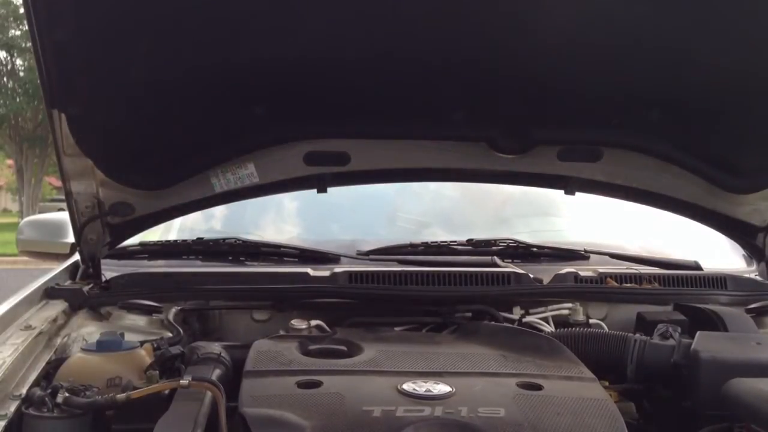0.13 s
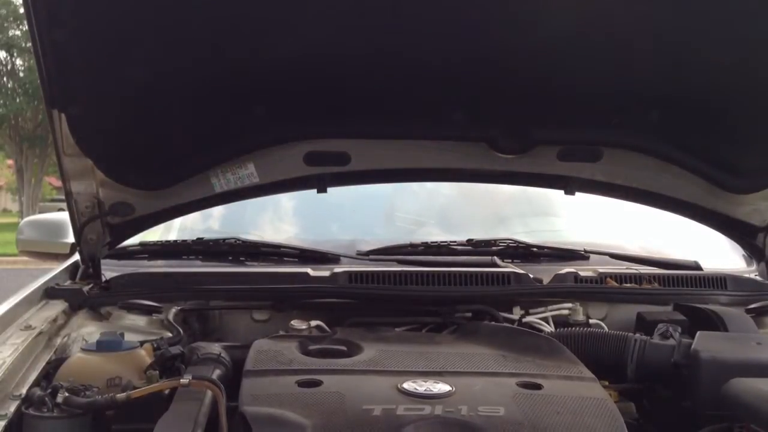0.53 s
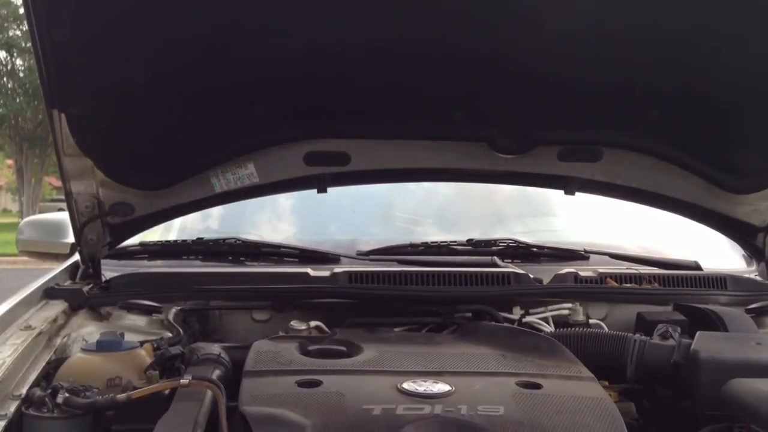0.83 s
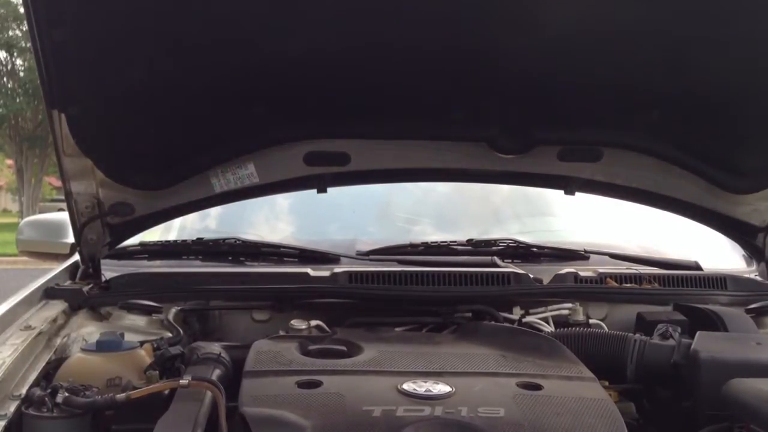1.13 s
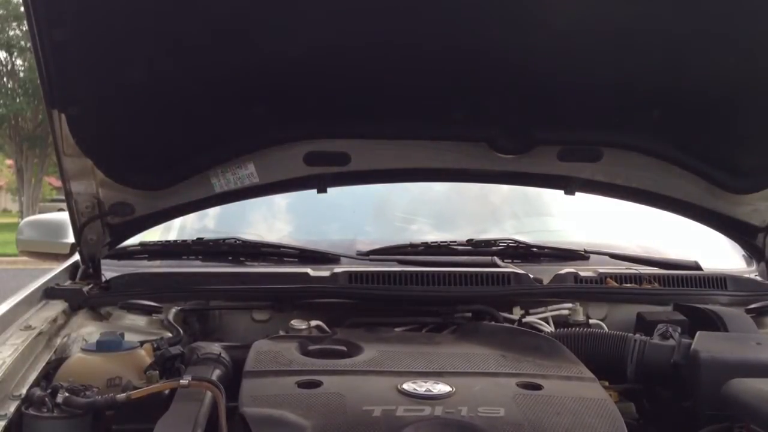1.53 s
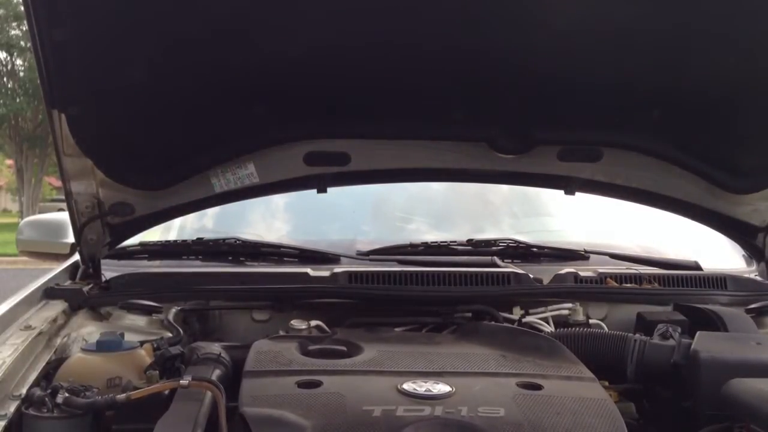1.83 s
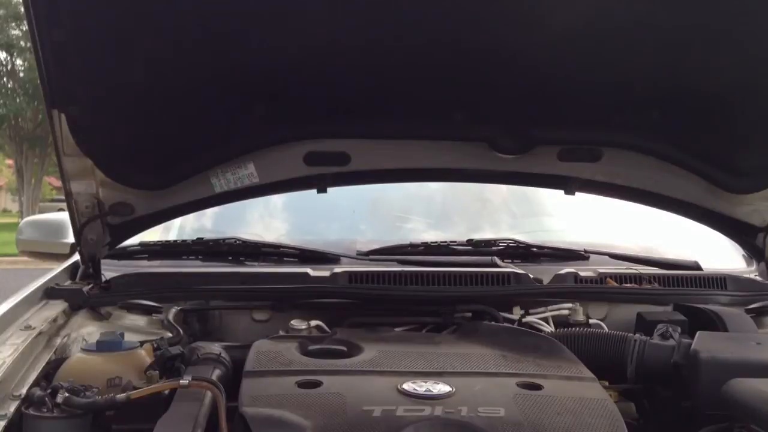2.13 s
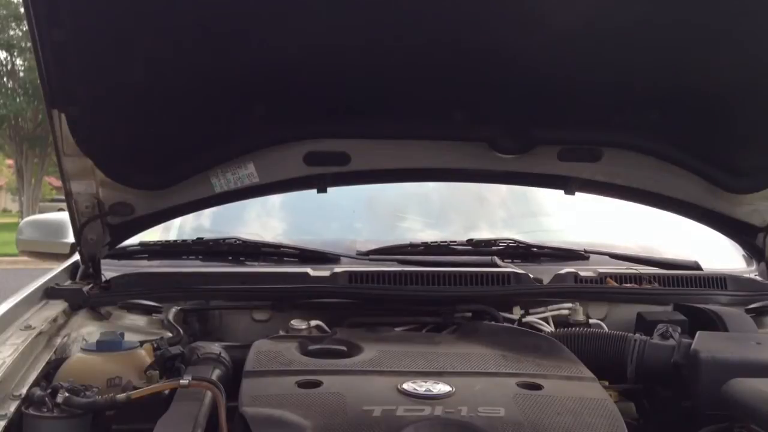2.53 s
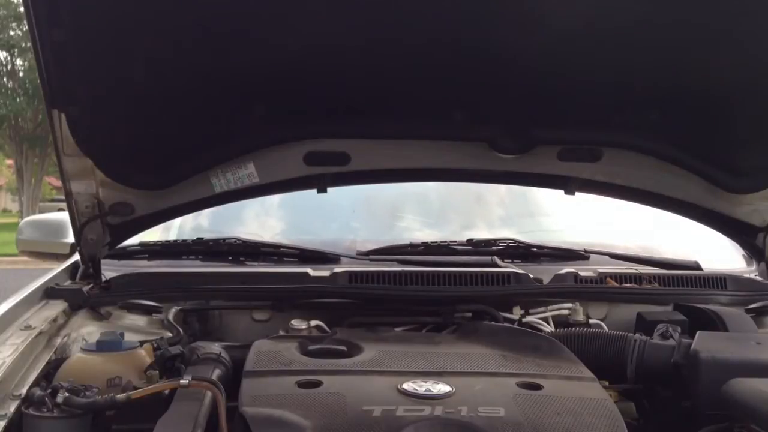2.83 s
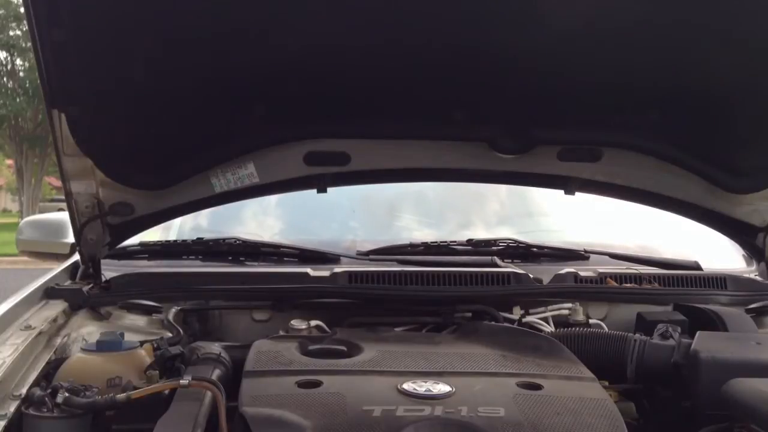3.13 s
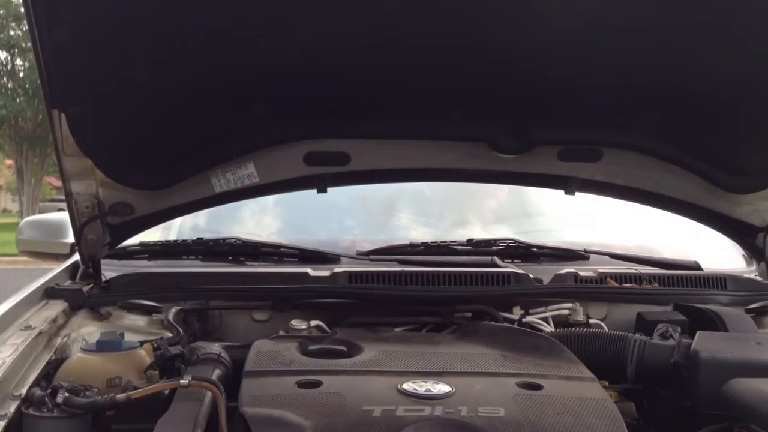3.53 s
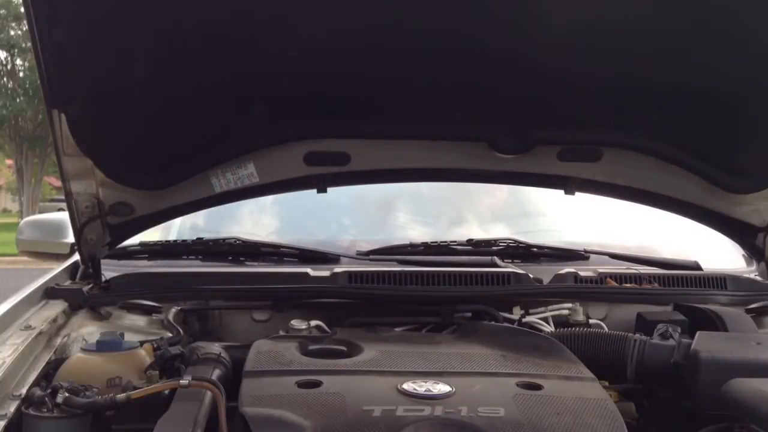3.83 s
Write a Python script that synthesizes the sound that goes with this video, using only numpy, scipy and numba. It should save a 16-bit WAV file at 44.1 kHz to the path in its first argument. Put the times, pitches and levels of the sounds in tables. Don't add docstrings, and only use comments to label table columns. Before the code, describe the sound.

A diesel engine runs down in an open engine bay, its hard metallic knocks spacing out from 0 to 0.6 s with low thumps and a faint squeal. At once a rough geared motor whirs, steady until about 1.4 s, then sinking and stopping near 2.05 s with a small catch. Quiet distant traffic and hum remain; faint birds whistle from 2.5 s, and a relay snaps and bounces at 2.8 s.

```python
import sys
import numpy as np
from scipy import signal
from scipy.fft import rfft, irfft
from scipy.io import wavfile
from scipy.ndimage import uniform_filter1d
from numba import njit

SR = 44100
rng = np.random.default_rng(int(sys.argv[2]) if len(sys.argv) > 2 else 0)


def how_loud(loudness_db):
    steps = np.asarray(loudness_db, float) / 20
    return 10 ** steps


def log_audio(samples):
    frames = np.atleast_2d(samples).T
    limited = np.clip(frames, -1, 1)
    pcm = np.round(limited * 32767).astype(np.int16)
    wavfile.write(sys.argv[1], SR, pcm)


N = 176400
TIME_S = np.arange(N) / SR


def level(x):
    return x / np.sqrt(np.mean(x ** 2))


def curve(rows, order, off=-120.):
    rows = np.array(rows)
    return np.interp(TIME_S, rows[:, 0], rows[:, order], off, off)


@njit
def svf(x, hz, width):
    y, band, low = np.empty(len(x)), 0., 0.
    g, k = np.tan(np.pi * hz / SR), width / hz
    for i in range(len(x)):
        v = (band + g * (x[i] - low)) / (1 + g * (g + k))
        band, low, y[i] = 2 * v - band, low + 2 * g * v, k * v
    return y


def resonate(x, hz, width_hz, times=1):
    for _ in range(times):
        x = svf(x, float(hz), float(width_hz))
    return x


def treble(x):
    return signal.sosfilt(signal.butter(2, 3600, "high", fs=SR, output="sos"), x)


def colour(x, table):
    table, size = np.array(table), 2048
    hz = np.maximum(np.arange(size // 2 + 1) * SR / size, 1)
    gain_db = np.interp(np.log(hz), np.log(table[:, 0]), table[:, 1])
    cep = irfft(gain_db * np.log(10) / 20)
    cep[1:size // 2] *= 2
    cep[size // 2 + 1:] = 0
    return signal.fftconvolve(x, irfft(np.exp(rfft(cep))))[:N]


def noise():
    return rng.standard_normal(N)


def walk(rate_hz):
    k = int(SR / rate_hz)
    held = np.repeat(rng.standard_normal(N // k + 1), k)
    return 1.3 * uniform_filter1d(uniform_filter1d(held, k), k)[:N]


def grit():
    return level(noise() * how_loud(1.5 * rng.exponential(size=N)))


def metal(gate, peaks, tilt, broad_db, flicker_db):
    x, ringing = gate * grit(), 0
    for k, (hz, width_hz, db) in enumerate(peaks):
        gain = (-1) ** k * how_loud(db + flicker_db * walk(25))
        ringing = ringing + gain * resonate(x, hz, width_hz)
    broad = level(colour(gate * grit(), tilt))
    return level(level(ringing) + how_loud(broad_db) * broad)


def tone(hz, db, wander, flutter_db):
    gain = np.sqrt(2) * how_loud(db + flutter_db * walk(30))
    return gain * np.sin(np.cumsum(2 * np.pi * hz * (1 + wander * walk(40)) / SR))


def gliding_tone(rows, wander, flutter_db):
    return tone(curve(rows, order=1, off=None), curve(rows, order=2), wander, flutter_db)


def rings(start_s, modes):
    u = np.arange(int(.2 * SR)) / SR
    out, at = np.zeros(N), int(start_s * SR)
    struck = sum(how_loud(db - 60 * u / t60) * np.sin(2 * np.pi * hz * u) for hz, db, t60 in modes)
    out[at:at + len(u)] = struck * np.minimum(u / .0016, 1)
    return out


# (frequency [Hz], density [dB per Hz])
TRAFFIC_TILT = [(15, -58), (25, -31), (104, -12), (147, -5.5), (226, -4.5), (329, -10), (2090, -25.5),
                (4320, -29), (15300, -35)]
# (pitch [Hz], width [Hz], level [dB])
MACHINE_HUM = [(157.6, 16, -59), (229, 8, -61), (343, 19, -75)]


def town():
    traffic = how_loud(-58 + 0.65 * walk(1.3)) * level(colour(noise(), TRAFFIC_TILT))
    hum = 0
    for hz, width_hz, db in MACHINE_HUM:
        hum = hum + how_loud(db + 1.5 * walk(5)) * level(resonate(noise(), hz, width_hz, times=2))
    return traffic + hum


# (time [s], length [s], slow-end pitch [Hz], fast-end pitch [Hz], level [dB])
RISING_CALLS = [(2.475, .075, 3330, 2600, -73), (2.62, .115, 3440, 2600, -69)]
FALLING_CALLS = [(2.865, .045, 4350, 3600, -73), (3.035, .06, 4420, 3500, -71),
                 (3.29, .045, 4400, 3300, -73), (3.475, .05, 4420, 3600, -71),
                 (3.655, .06, 4430, 3900, -70), (3.845, .05, 4400, 3500, -72), (3.0, .09, 900, 820, -68)]


def birds():
    out = 0
    for rows, rising in ((RISING_CALLS, True), (FALLING_CALLS, False)):
        for start_s, length_s, slow_hz, fast_hz, db in rows:
            u = np.clip((TIME_S - start_s) / length_s, 0, 1)
            sweep = (1 - u if rising else u) ** 3.5
            breath = np.sqrt(np.abs(np.sin(np.pi * u))) * (1 - .6 * sweep) * (u < 1)
            hoarse = .8 + .6 * walk(600)
            pitch_hz = slow_hz + (fast_hz - slow_hz) * sweep
            out = out + breath * hoarse * tone(pitch_hz, db, wander=.008, flutter_db=1.0)
    trees = rng.standard_normal(8000) * np.exp(-np.arange(8000) / SR / .04)
    return out + how_loud(-30) * signal.fftconvolve(out, trees)[:N]


# (time [s], level [dB], crack centre [Hz], ring level [dB], crack decay [s])
CLICKS = [
    (2.026, -44, 4500, -12, .01),
    (2.7545, -51, 4300, -9, 0.01),
    (2.773, -58, 450, 0, .008),
    (2.7925, -40, 3400, -4, 0.006),
    (2.808, -55, 1700, 2, .007),
    (2.822, -55, 7000, -8, .014),
    (2.824, -57, 10000, -10, .014),
]
# (pitch [Hz], level [dB], t60 [s])
RELAY_MODES = [(325, 1, .1), (565, 3, .045), (1723, -6, .05), (2848, -3, .06), (3144, -8, .07),
               (4430, -9, .05), (4640, -3, .07)]


def relay():
    out = 0
    for start_s, db, hz, ring_db, fall_s in CLICKS:
        since_s = np.maximum(TIME_S - start_s, 0)
        crack = noise() * np.exp(-since_s / fall_s) * (since_s > 0)
        thud = noise() * np.exp(-since_s / (2 * fall_s)) * (since_s > 0)
        modes = [(f, g - abs(np.log2(f / hz)), t60) for f, g, t60 in RELAY_MODES]
        body = how_loud(ring_db - 6) * rings(start_s, modes)
        snap = 1.6 * resonate(crack, hz, 0.7 * hz, times=2)
        fizz = how_loud(-13) * resonate(crack, 9500, 4000, times=2)
        housing = resonate(thud, 560, 400) + how_loud(-6.5) * resonate(thud, 1770, 1600)
        out = out + how_loud(db) * (body + snap + fizz + housing)
    return out


# (pitch [Hz], width [Hz], level [dB])
MOTOR_BODY = [(584.6, 25, -9), (996, 74, -4), (1199, 57, -1.5), (1256, 26, 2.5), (1457, 62, -4.5),
              (1670, 55, -6.5), (1937, 25, 1.5), (2007, 180, -9), (2311, 37.5, 1.5), (2660, 110, -6.5),
              (2860, 34, -4), (3073, 120, -9.5), (5000, 660, -14), (9320, 250, -19)]
# (frequency [Hz], density [dB per Hz])
MOTOR_TILT = [(35, -83.5), (60, -40), (290, -6), (472, -17), (581, -8.5), (2280, -1.5), (3460, -10),
              (9170, -15), (15300, -22)]


def motor_casing(teeth, hz):
    casing = metal(teeth, MOTOR_BODY, MOTOR_TILT, broad_db=-3, flicker_db=1.2)
    treble_db = -1 * np.log2(hz / 300)
    return casing + (how_loud(treble_db) - 1) * treble(casing)


# (pitch [Hz], width [Hz], level [dB])
PINION_RINGS = [(586, 23, -11), (743, 35, -13), (1480, 30.2, -14), (1691, 30.2, -13.5)]


def loose_pinion(teeth):
    gate = np.clip((TIME_S - 1.19) / 0.021, 0, 1) * teeth
    loose = gate * grit()
    return sum(how_loud(db) * level(resonate(loose, f, w)) for f, w, db in PINION_RINGS) / np.sqrt(1.5)


# (pitch [Hz], half-width [Hz], lift [dB])
OVERTONE_LIFT = [(750, 40, 14), (990, 50, 9), (1255, 50, 19), (1930, 50, 11), (2325, 50, 9)]
# (time [s], level [dB])
WHINE = [(.63, -3), (.72, 3), (.8, 0), (.95, 3), (1.05, 5), (1.18, 9), (1.2, -3), (1.5, -4), (1.7, 1),
         (1.95, 0)]


def gear_whine(phase, hz, load_db, tone_db):
    rough = 1 + .45 * walk(70)
    out = how_loud(tone_db + 3.5 + 2 * walk(30)) * rough * np.sin(2 * np.pi * phase)
    whine_db = curve(WHINE, order=1, off=None)
    for k in range(2, 9):
        lift_db = sum(db / (1 + ((k * hz - f) / w) ** 2) for f, w, db in OVERTONE_LIFT)
        gain = how_loud(load_db - 24.5 + lift_db + whine_db + 1.5 * walk(29.38))
        out = out + gain * np.sin(2 * np.pi * k * phase)
    return out


def motor_drone(hz, load_db):
    low = level(resonate(resonate(noise(), 300, 150), 390, 150))
    upper = level(resonate(noise(), 460, 350))
    return how_loud(load_db - 19.5) * low + how_loud(load_db - 21.5 - 17 * np.log2(hz / 300)) * upper


# (time [s], tooth rate [Hz], load level [dB], tone level [dB])
MOTOR_RUN = [(.62, 300, -45, -42), (.636, 315.4, -23, -40), (.66, 322.2, -17.5, -28),
             (.755, 337.7, -17.5, -30.5), (.85, 324.8, -18.5, -35), (1.0, 314.8, -20, -27.5),
             (1.12, 315, -21, -30), (1.175, 311.5, -23, -33), (1.2, 300, -23, -36.5),
             (1.42, 298.2, -25, -44), (1.56, 270.3, -25.5, -35), (1.74, 246, -28, -48.5),
             (1.8, 225, -31, -47), (1.83, 202.5, -33, -35), (1.895, 198.5, -34, -36),
             (1.925, 190, -36.5, -63), (2.0, 170.8, -44.5, -75), (2.04, 159.8, -45.5, -80),
             (2.065, 150, -68, -90)]
# (time [s], pitch [Hz], level [dB])
BEARING_SQUEAK = [(1.84, 9120, -70), (1.88, 9100, -57), (1.915, 9090, -54), (1.95, 9080, -70)]


def motor():
    hz = curve(MOTOR_RUN, order=1, off=None)
    load_db, tone_db = curve(MOTOR_RUN, order=2), curve(MOTOR_RUN, order=3)
    phase = np.cumsum(hz * (1 + .009 * walk(60)) / SR)
    teeth = (.35 + np.exp(-(phase % 1) / 0.56)) * how_loud(0.69 * walk(70))
    mesh = how_loud(load_db) * (motor_casing(teeth, hz) + loose_pinion(teeth))
    squeak = gliding_tone(BEARING_SQUEAK, wander=.008, flutter_db=3.0)
    return mesh + gear_whine(phase, hz, load_db, tone_db) + motor_drone(hz, load_db) + squeak


# (time [s], pitch [Hz], level [dB], t60 [s])
THUMPS = [(.09, 178, -28, 0.16), (0.219, 175, -25, .2), (0.57, 188.6, -23, 0.25), (0.572, 128, -29.5, 0.18),
          (.7, 160.6, -34, 0.22), (.82, 178, -28.5, .15)]


def mount_thumps():
    out = 0
    for start_s, hz, db, t60_s in THUMPS:
        since_s = np.maximum(TIME_S - start_s, 0)
        onset = np.clip(since_s / 0.01, 0, 1) ** 2
        out = out + how_loud(db - 60 * since_s / t60_s) * np.sin(2 * np.pi * hz * since_s) * onset
    return out


# (time [s], pitch [Hz], level [dB])
PINGS = [(0.032, 4970, -21), (.064, 4870, -16), (.064, 960, -17), (.089, 1000, -15.5), (.094, 4780, -15.5),
         (0.1, 1000, -20), (0.116, 2600, -19.5), (.119, 1050, -16.5), (.1225, 5050, -12.5),
         (.149, 1020, -20), (0.152, 5000, -19.5), (0.174, 2532, -19), (0.21, 2940, -13), (.214, 5330, -19),
         (.243, 4800, -22), (.279, 940, -26), (.314, 2300, -20), (0.319, 5240, -16.5), (.357, 2270, -16.5),
         (.404, 4770, -20.5), (.456, 1100, -25), (0.518, 1220, -21), (0.5785, 2680, -11.5),
         (.58, 1080, -17.5), (.583, 677, -18)]


def block_pings():
    t60_s, spread = 0.04, 0.075
    return sum(rings(s, [(hz, db, t60_s), (hz * (1 + spread), db - 6.5, t60_s)]) for s, hz, db in PINGS)


# (time [s], level [dB], treble lift [dB], length factor [1])
KNOCKS = [(.004, -17, -2, 1.17), (0.036, -24.5, 0, 1.36), (0.065, -20.5, 1, 0.75), (0.095, -20, 0.5, 0.99),
          (0.123, -16, -1.5, 0.8), (0.153, -16.5, 4.5, 0.97), (.181, -21, -8.5, 0.8),
          (0.214, -21.5, 6.5, 1.1), (0.247, -20, -2, 1.1), (.283, -22, 5, 0.8), (0.321, -21.5, -1, 1.25),
          (0.362, -20.5, -4, 1.1), (0.409, -23, 1, 1.33), (0.461, -20.5, -7.5, 1.22),
          (0.521, -23.5, -4, 1.4), (0.582, -16, -5.5, 1.23), (.608, -27, 2, 3.8)]
# (pitch [Hz], width [Hz], level [dB])
KNOCK_BODY = [(390, 80, -5), (810, 68, -2.5), (1000, 88, -6.5), (1250, 80, 2.5), (1550, 110, -5),
              (2020, 80, -4), (2260, 120, 1.5), (2800, 250, -3), (4020, 220, -9.5), (4865, 780, -5),
              (7260, 300, -11), (8800, 660, -12.5)]
# (frequency [Hz], density [dB per Hz])
KNOCK_TILT = [(35, -69), (60, -36), (155, -6.5), (374, -5), (483, -2), (1220, -3), (3630, -9.5),
              (4900, -10), (15300, -19)]


def knocks():
    rise_s, fall_s = .0058, .009
    rattle = how_loud(-27 - 10.5 * TIME_S) * (TIME_S < 0.56)
    low = high = rattle
    for peak_s, db, lift_db, length in KNOCKS:
        since_s = (TIME_S - peak_s) / length
        shape = np.exp(-np.where(since_s < 0, (since_s / rise_s) ** 2 / 2, since_s / fall_s))
        low = low + how_loud(db) * shape
        high = high + how_loud(db + lift_db) * shape
    block = metal(1, KNOCK_BODY, KNOCK_TILT, broad_db=3.0, flicker_db=2.0)
    block = signal.sosfilt(signal.butter(2, 120, "high", fs=SR, output="sos"), block)
    return low * block + (high - low) * treble(block)


# (time [s], pitch [Hz], level [dB])
INTAKE = [(0, 420, -32), (.07, 395, -29.5), (.15, 340, -33), (.2, 320, -54.5)]
# (time [s], pitch [Hz], level [dB])
SQUEAL = [(.3, 5650, -55), (.43, 5650, -44), (.5, 5680, -46), (.565, 5700, -39), (.6, 5700, -55)]


def engine():
    moan = gliding_tone(INTAKE, wander=.06, flutter_db=5.)
    squeal = gliding_tone(SQUEAL, wander=.004, flutter_db=1.5)
    return knocks() + block_pings() + mount_thumps() + moan + squeal


def scene():
    covers = signal.butter(2, 11000, fs=SR, output="sos")
    near = signal.sosfilt(covers, engine() + motor()) + relay()
    bay = how_loud(-42) * rng.standard_normal(6000) * np.exp(-np.arange(6000) / SR / .015)
    return (near + signal.fftconvolve(near, bay)[:N] + birds() + town())[None]


def band_limit(x):
    return signal.sosfilt(signal.butter(12, 15410, fs=SR, output="sos"), x)


def record(dry):
    x = signal.sosfilt(signal.butter(1, 110, "high", fs=SR, output="sos"), dry)
    x = signal.sosfilt(signal.ellip(10, .2, 70, 15400, fs=SR, output="sos"), x)
    return band_limit(x)


dry = scene()
out = record(dry)
log_audio(out)
```